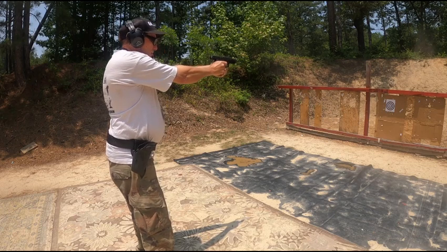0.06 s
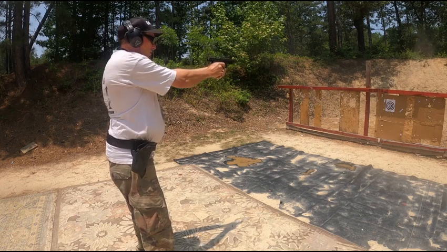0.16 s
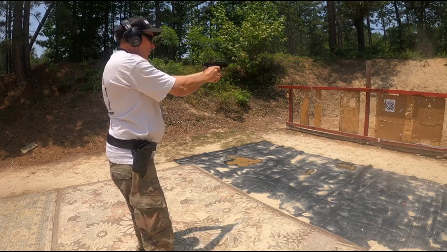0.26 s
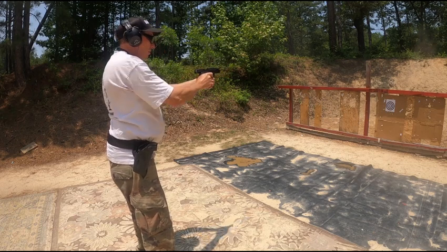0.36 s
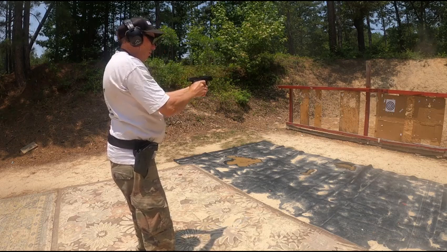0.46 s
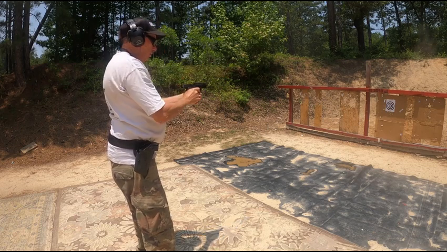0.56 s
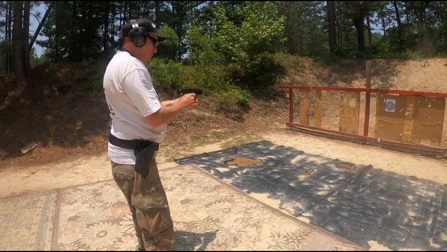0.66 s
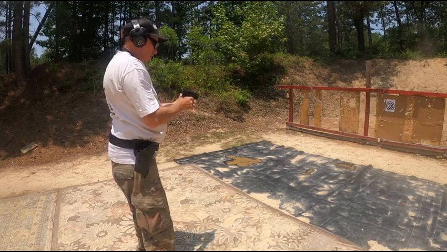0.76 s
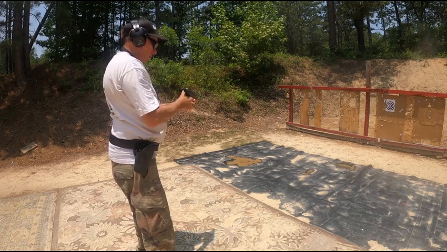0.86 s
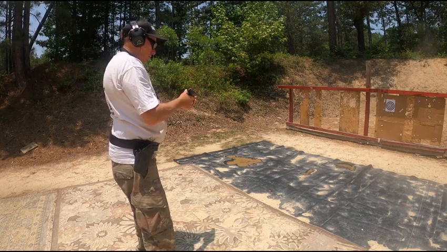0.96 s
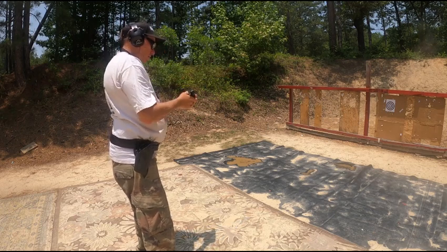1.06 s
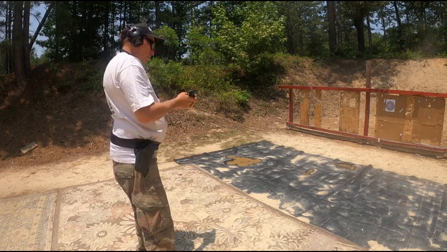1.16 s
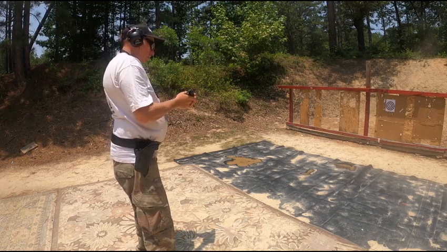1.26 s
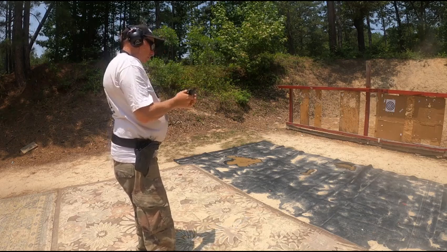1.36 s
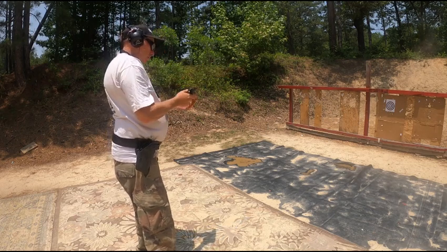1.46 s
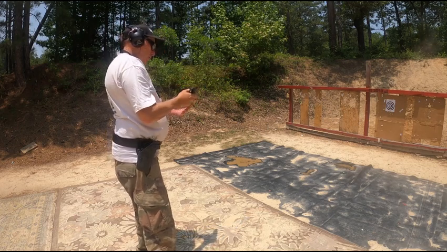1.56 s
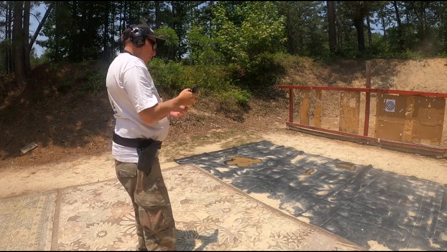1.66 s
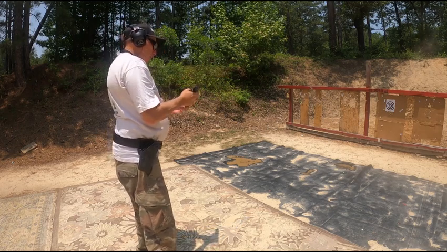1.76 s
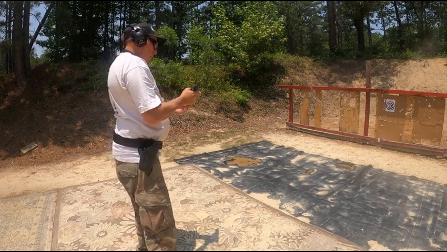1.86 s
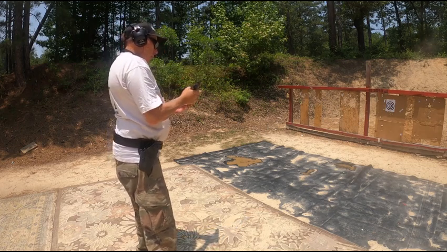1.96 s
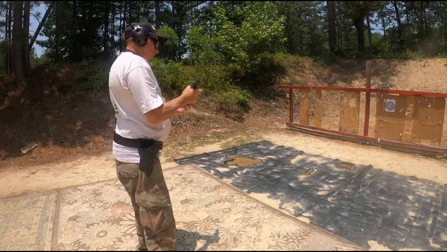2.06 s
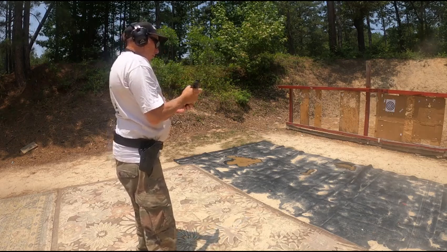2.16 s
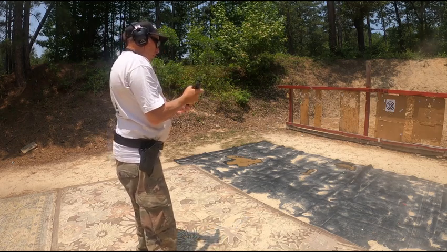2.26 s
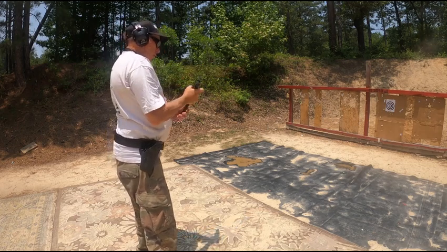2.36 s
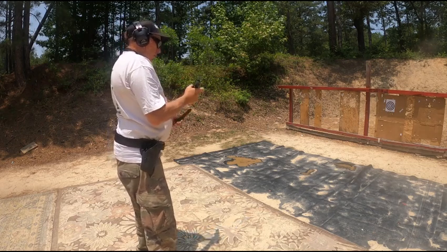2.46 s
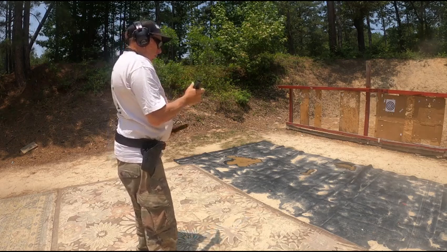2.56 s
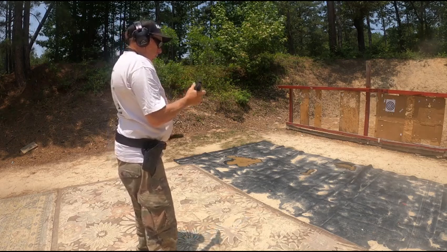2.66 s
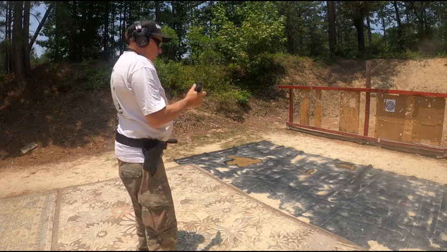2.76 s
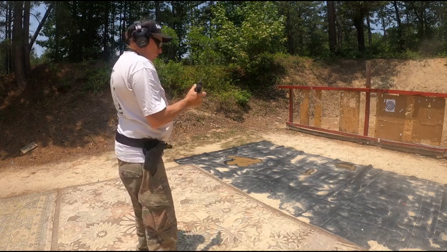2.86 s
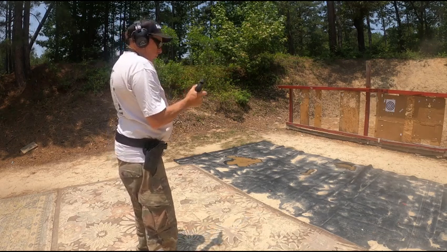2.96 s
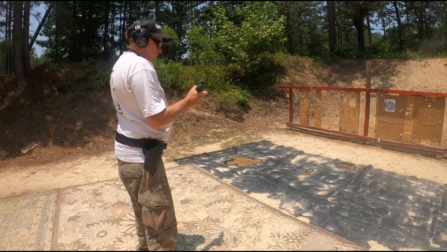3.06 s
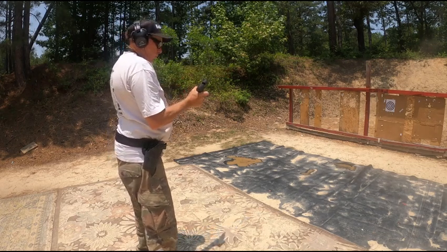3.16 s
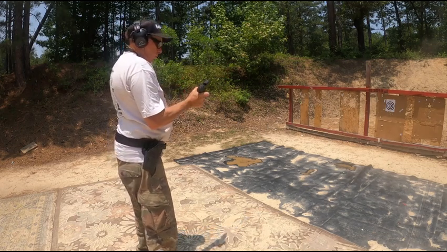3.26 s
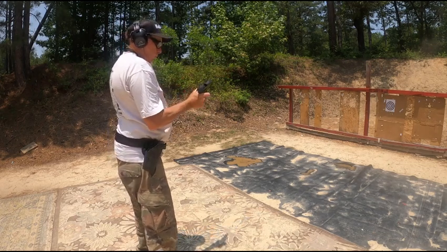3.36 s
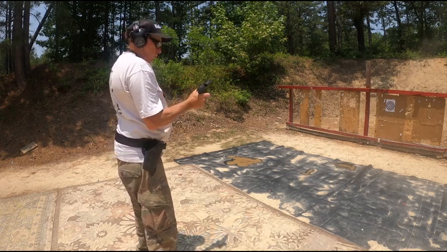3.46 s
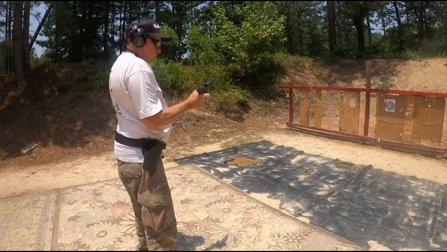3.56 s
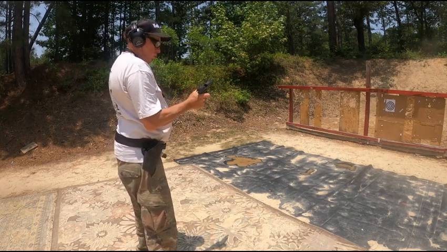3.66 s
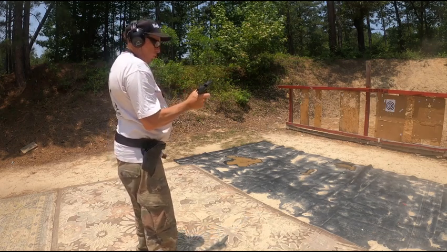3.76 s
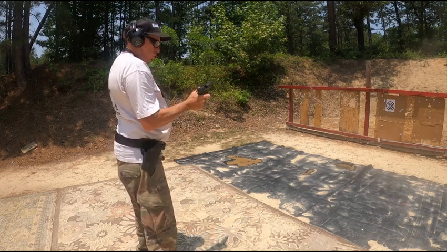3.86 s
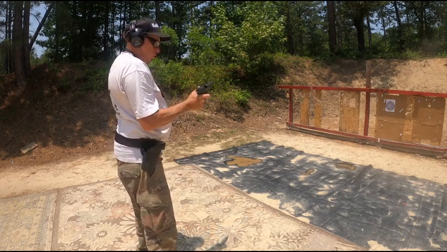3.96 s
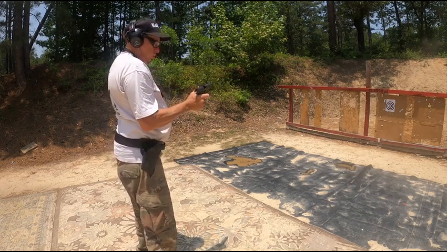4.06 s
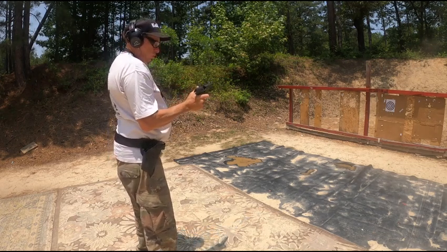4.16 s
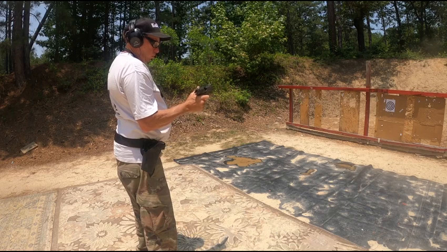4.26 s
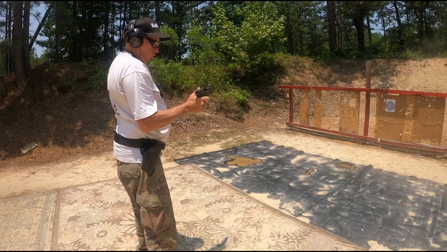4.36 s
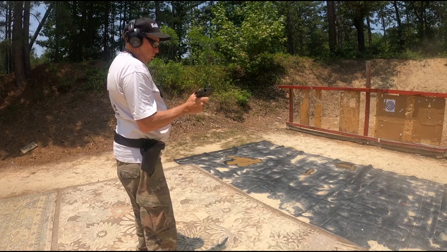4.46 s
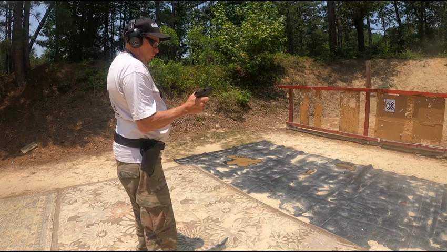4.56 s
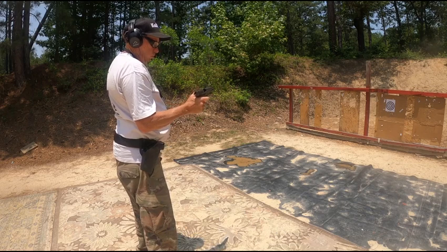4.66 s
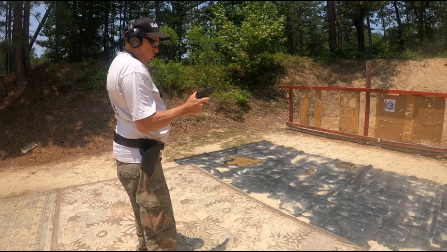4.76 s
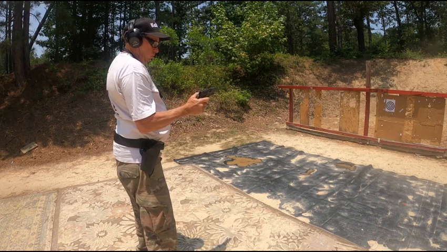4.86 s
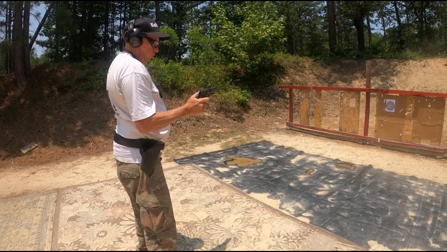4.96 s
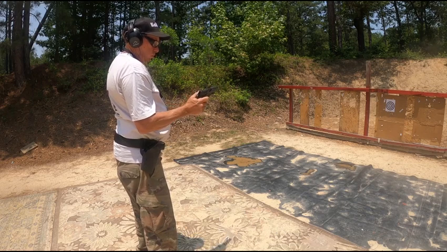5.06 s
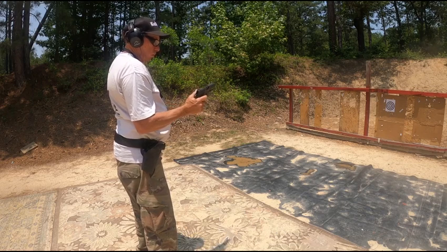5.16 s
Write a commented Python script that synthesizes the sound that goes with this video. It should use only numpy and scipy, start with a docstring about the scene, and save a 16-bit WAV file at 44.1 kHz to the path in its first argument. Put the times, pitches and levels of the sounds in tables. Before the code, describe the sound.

An outdoor pistol blast rolls off into trees, followed by quiet metallic handling clicks and a sharp snap of the slide closing.

```python
"""An outdoor pistol range among woods. A shot has just gone off: its blast slaps back from the berms
and rolls away through the trees, over a faint breeze. A bird whistles far off. The magazine is unlatched
and scrapes out of its well, and the pistol's steel ticks in the hands; dull bumps and a soft, far rush
pass by. A catch rings, then the spring drives the slide forward, it snaps shut on its stop, and the
range answers with a short echo."""
import sys
import numpy as np
from scipy import signal
from scipy.fft import rfft, irfft
from scipy.io import wavfile

SR = 44100
rng = np.random.default_rng(int(sys.argv[2]) if len(sys.argv) > 2 else 0)


def wrap_up_sound(samples):
    """Save the sound to the file named by the first command line argument, as 16-bit audio."""
    columns = np.atleast_2d(samples).T
    # keep every value between -1 and 1, then stretch to whole-number steps
    tamed = np.clip(columns, -1, 1)
    steps = np.round(tamed * 32767).astype(np.int16)
    wavfile.write(sys.argv[1], SR, steps)


N = 229981
TIME, FREQS = np.arange(N) / SR, np.fft.rfftfreq(N, 1 / SR)
FRAMES_DELAY_S = .028  # to the target frames and back


def from_db(db):
    """Decibels to gain."""
    return 10 ** (np.asarray(db) / 20)


def rms_one(x):
    """Scale to rms 1."""
    return x / np.sqrt(np.mean(x ** 2) + 1e-20)


def eq_gain(curve):
    """Gain at each frequency from (f/Hz, level/dB) points on a log-frequency axis."""
    hz, db = np.transpose(curve)
    return from_db(np.interp(np.log(FREQS + 0.0014), np.log(hz), db))


def coloured(x, curve):
    """Shape a steady signal with an EQ curve; rms 1."""
    return rms_one(irfft(rfft(x) * eq_gain(curve) * (FREQS > 20), N))


def noise(curve):
    """Noise shaped by an EQ curve; rms 1."""
    return coloured(rng.standard_normal(N), curve)


def band(x, low_hz, high_hz, order=2):
    """Causal band-pass."""
    sos = signal.butter(order, [low_hz, min(high_hz, .45 * SR)], "band", fs=SR, output="sos")
    return signal.sosfilt(sos, x)


def band_noise(low_hz, high_hz):
    """Band-passed noise; rms 1."""
    return rms_one(band(rng.standard_normal(N), low_hz, high_hz))


def envelope(start_s, attack_s, length_s, sag_db_per_s, fall_db_per_s):
    """Rises to 1, sags until its length is over, then falls away."""
    age = np.maximum(TIME - start_s, 0)
    rise = np.minimum(age / max(attack_s, 1 / SR), 1) ** 2
    held = np.maximum(np.minimum(age, length_s) - attack_s, 0)
    released = np.maximum(age - max(length_s, attack_s), 0)
    return rise * from_db(-sag_db_per_s * held - fall_db_per_s * released)


def burst(start_s, attack_s, fall_db_per_s):
    """Rises to 1 and falls away at once."""
    return envelope(start_s, attack_s, 0, 0, fall_db_per_s)


def resonate(x, modes):
    """Parallel resonances of (f/Hz, width/Hz, level/dB), with alternating signs."""
    out = 0
    for k, (hz, width, db) in enumerate(modes):
        r = np.exp(-np.pi * width / SR)
        poles = [1, -2 * r * np.cos(2 * np.pi * hz / SR), r * r]
        ring = signal.lfilter([1, 0, -1], poles, x + 1e-18)
        out = out + (-1) ** k * from_db(db) * (1 - r * r) / 2 * ring
    return out


def slips(per_s, spread_db):
    """Dense stick-slip clicks of uneven size."""
    sizes = from_db(spread_db * np.minimum(rng.exponential(1, N), 4)) * rng.choice([-1, 1], N)
    return sizes * (rng.random(N) < per_s / SR)


def scatter(x, strength):
    """Up to a second of small reflections under a strength envelope; the response has unit energy."""
    response = rng.standard_normal(SR) * strength[:SR]
    return signal.fftconvolve(x, response / np.linalg.norm(response))[:N]


# Mid-heavy EQ of the blast's tail: f/Hz, level/dB
ROLL_EQ = [(40, -36), (130, -19.5), (260, -9.5), (500, -2), (900, -1), (1300, -2.5), (1900, -11),
           (2600, -7.5), (3500, -11.5), (5500, -17), (8500, -23), (11000, -35), (15000, -52)]

def rolling_blast(absorb_db_per_s=8.0, bass_linger_db_per_s=5.0):
    """Berms and woods scatter the blast; later sound has crossed more air and leaves, so it is duller."""
    berms = from_db(-33.5 - 87 * np.maximum(TIME - 0.14, 0))  # short hold, fast release
    woods = from_db(-39 - 18 * TIME)  # long tail
    spectrum = rfft(noise(ROLL_EQ))
    spectrum /= np.std(irfft(spectrum * (FREQS > 700) * (FREQS < 1400), N))  # rms 1 around 1 kHz
    centres = np.geomspace(200, 16000, 22)
    roll = 0
    for khz, selector in zip(centres / 1000, np.eye(len(centres))):
        loss_db_per_s = absorb_db_per_s * (khz ** 0.97 - 1) - bass_linger_db_per_s * max(1 - khz, 0)
        one_band = irfft(spectrum * np.interp(FREQS, centres, selector), N)
        roll = roll + one_band * from_db(-loss_db_per_s * TIME)
    return roll * np.hypot(berms, woods)


# Low-end body of the blast: f/Hz, level/dB
BOOM_EQ = [(25, -11), (60, 1), (130, -10.5), (230, 14), (400, -6.5), (900, -44)]

def boom():
    """The bass of the blast stays between the berms for a quarter of a second."""
    shape = envelope(0, 0, length_s=0.18, sag_db_per_s=123, fall_db_per_s=353)
    return from_db(-30.5) * shape * noise(BOOM_EQ)


# Slapbacks of the blast: t/s, peak level/dB, pulse pitch f/Hz
SLAPS = [(.0083, -16.5, 680), (0.0127, -22, 456), (0.0607, -18, 264), (0.109, -26, 200), (.222, -31, 480)]

def slaps():
    """Flat surfaces return the blast as single pressure waves: a dip, then a crest."""
    out = np.zeros(N)
    for s, db, hz in SLAPS:
        phase = 2 * np.pi * hz * (TIME - s)
        out += from_db(db) * phase * np.exp((1 - phase ** 2) / 2)
    return out


# Low bed of the breeze: f/Hz, level/dB
RUMBLE_EQ = [(25, -8.5), (60, -2), (110, -6), (140, 0), (180, 2.5), (230, -4.5), (290, -10), (450, -17.5),
             (800, -49)]
# Airy hiss of leaves and insects: f/Hz, level/dB
LEAVES_EQ = [(300, -10), (500, -0.5), (750, -7), (1250, -5.5), (2200, -9), (3100, -14), (5000, -20),
             (7500, -20.5), (8200, -27.5), (9300, -24.5), (10500, -38), (15500, -49)]

def breeze(full_at_s=2.68, rise_db_per_s=5.5):
    """A soft, lumpy rumble and a hiss of leaves fade up after the shot."""
    gusts = from_db(1.1 * noise([(20, 1.5), (30, 3), (60, -59.0)]))
    rumble = from_db(-62) * gusts * noise(RUMBLE_EQ)
    leaves = from_db(-70) * noise(LEAVES_EQ)
    return (rumble + leaves) * from_db(-rise_db_per_s * np.maximum(full_at_s - TIME, 0))


# The bird's phrase: t/s, length/s, first f/Hz, last f/Hz, level/dB before the mix
BIRD_NOTES = [(1.615, .03, 3500, 3360, -78), (1.631, 0.05, 3080, 2940, -65.5),
              (1.648, 0.01, 6200, 4900, -68.5), (1.694, 0.071, 2913, 3170, -67),
              (1.745, 0.055, 2850, 2434, -67), (1.788, 0.065, 2580, 3260, -67),
              (1.815, 0.048, 6460, 5270, -76), (1.838, 0.0644, 3330, 3675, -67.5),
              (1.883, 0.116, 3430, 3340, -72.5), (2.031, 0.041, 4840, 5310, -73),
              (2.073, 0.032, 7120, 4590, -62)]

def bird(near_db=-2.0, woods_db=-3.5):
    """Gliding, slightly warbling whistles; near branches blur them and the far trees add a dull tail."""
    song = np.zeros(N)
    flutter = 1 + .02 * band_noise(60, 250)
    for s, length, first_hz, last_hz, db in BIRD_NOTES:
        progress = np.clip((TIME - s) / length, 0, 1)
        pitch = (first_hz + (last_hz - first_hz) * progress) * flutter
        song += from_db(db) * 2 * np.sin(np.pi * progress) * np.sin(2 * np.pi * np.cumsum(pitch) / SR)
    blurred = (song + scatter(song, burst(0, 0, fall_db_per_s=400))) / 2
    tail = band(scatter(song, burst(0, attack_s=0.013, fall_db_per_s=55)), 1500, 4000)
    return from_db(near_db) * blurred + from_db(woods_db) * tail


# Ring of the magazine's steel tube: f/Hz, width/Hz, level/dB
MAGAZINE_MODES = [(1275, 44, 3.5), (2200, 107, 9), (3398, 21, 5), (3840, 42, 2.5), (4300, 160, -17),
                  (4700, 43, -39), (5620, 18, 0), (6230, 71, -20), (6500, 61, -10), (7300, 130, -1.5),
                  (8700, 14, 1), (9030, 33, -4)]
# EQ of the dry scrape: f/Hz, level/dB
RUB_EQ = [(300, -39), (750, -19), (1250, -4), (1650, -54), (2400, 10), (3400, 4), (4400, 1), (5000, -8),
          (9000, -12), (10500, -16), (15000, -27)]
# Pulls on the magazine: t/s, length/s, level/dB, sag as the grip loosens/(dB/s)
PULLS = [(2.277, 0.12, -46.5, 192), (2.504, 0.16, -43, 65)]

def magazine(ring_share=0.36, spring_db=-8, judder_db=2.5):
    """The tube judders along the well and sings in its own modes; its spring rings on."""
    friction = slips(per_s=5000, spread_db=3.5) * from_db(judder_db * band_noise(20, 160))
    grip = sum(from_db(db) * envelope(s, 0.034, length, sag, fall_db_per_s=480)
               for s, length, db, sag in PULLS)
    rub = coloured(friction, RUB_EQ)
    ring = rms_one(resonate(friction, MAGAZINE_MODES))
    scrape = grip * rms_one((1 - ring_share) * rub + ring_share * ring)
    spring = resonate(scrape, [(3360, 40, 0.8), (3380, 40, -2.9)])
    return scrape + from_db(spring_db) * np.std(scrape) * rms_one(spring)


# Ring of the frame and slide: f/Hz, width/Hz, level/dB
PISTOL_MODES = [(3060, 330, -4), (4200, 43, -13), (4300, 140, -9), (4680, 34, -32), (5140, 62, -2),
                (6200, 36, -43), (6520, 24, 2.5), (7540, 46, -12), (7320, 86, 4.5), (7530, 22, -10),
                (7500, 76, -34), (8850, 100, -32), (9220, 210, 2), (11100, 150, -8)]

def steel_hits(hits, chatter, pistol_ring_db, magazine_ring_db, band_ratio):
    """Each hit is a click and a dying chatter of steel on steel that sets the pistol ringing, with a share of
    the magazine tube's modes added to thicken the ring."""
    out, t = np.zeros(N), TIME[:SR // 10]
    for s, db, hz, chatter_ms in hits:
        force = rng.standard_normal(len(t)) * np.exp(-1000 * t / chatter_ms)
        force *= chatter * chatter_ms / np.linalg.norm(force)  # shorter contacts chatter less
        force[0] += 1  # the click
        force = band(force, hz / band_ratio, hz * band_ratio)
        pistol_ring = from_db(pistol_ring_db) * resonate(force, PISTOL_MODES)
        magazine_ring = from_db(magazine_ring_db) * resonate(force, MAGAZINE_MODES)
        hit = band(force + pistol_ring + magazine_ring, 370, 10000)
        hit *= from_db(db) * np.sqrt(.002 * SR) / np.linalg.norm(hit)  # rms as if packed into 2 ms
        start = int(s * SR)
        out[start:start + len(t)] += hit[:N - start]
    return out


# Handling ticks: t/s, level/dB, brightness f/Hz, chatter/ms
TICKS = [(2.295, -40, 1300, 3.6), (2.2995, -41.5, 3600, 3), (2.3103, -37, 6200, 6),
         (2.3436, -35, 1640, 3.8), (2.376, -41.5, 1920, 4.3), (2.449, -53.5, 1680, 6.4),
         (2.513, -46.5, 2960, 4.9), (2.602, -37, 2320, 9.9), (2.641, -43, 2970, 3.6),
         (2.6615, -39, 1660, 7.6), (3.354, -58.5, 5900, 2.8), (3.9138, -52, 6800, 11),
         (4.054, -52.5, 3070, 12), (4.0685, -37.5, 4470, 2.7), (4.074, -48, 2380, 7.6)]

def ticks():
    """Latch, magazine and small parts tick as the pistol is handled."""
    return steel_hits(TICKS, chatter=0.81, pistol_ring_db=6.5, magazine_ring_db=2, band_ratio=2.0)


def bay_echo(x, frames_db=-21.5, wash_db=-20):
    """One distinct reflection from the target frames, then a wash from berms and trees."""
    frames = scatter(x, burst(FRAMES_DELAY_S, 0, fall_db_per_s=7000))
    wash = scatter(x, envelope(0, attack_s=0.046, length_s=.16, sag_db_per_s=66, fall_db_per_s=350))
    return band(from_db(frames_db) * frames + from_db(wash_db) * wash, 1040, 18000, order=1)


# Soft low bumps: t/s, level/dB
BUMPS = [(2.689, -55), (4.398, -53), (4.70, -54)]

def bumps():
    """Dull thuds in the deep bass, as of shifting feet."""
    strength = sum(from_db(db) * burst(s, attack_s=0.018, fall_db_per_s=260) for s, db in BUMPS)
    return strength * band_noise(65, 131)


# Midrange EQ of the far rush: f/Hz, level/dB
RUSH_EQ = [(500, -21), (850, -5), (1200, 2), (1900, -8), (2700, -11), (4500, -27.5), (9000, -39)]

def far_rush():
    """A soft rush, perhaps a far shot rolling through the woods, swells and fades."""
    return from_db(-59) * burst(2.745, attack_s=.19, fall_db_per_s=16.5) * noise(RUSH_EQ)


def catch(start_s=4.067, level_db=-41.5, echo_db=-14):
    """The catch rings briefly on one note, and the target frames throw the ring back."""
    direct, echo = (burst(start_s + delay, attack_s=0.0012, fall_db_per_s=1702)
                    for delay in (0, FRAMES_DELAY_S))
    return from_db(level_db) * band_noise(4300, 4860) * (direct + from_db(echo_db) * echo)


def slide_blows(release_s, shut_s):
    """The slide knocks along its rails, ever brighter, hits the stop and rebounds, ever weaker."""
    # t/s, level/dB, brightness f/Hz, chatter/ms
    knocks = [(release_s + k * .005, -21, 2460 + k * 332, 2.2) for k in range(4)]
    stop = [(shut_s, -7, 3420, 0.97)]
    rebounds = [(shut_s + (k + 1) * .0037, -14.5 - k * 6.5, 4100, 3) for k in range(3)]
    blows = knocks + stop + rebounds
    return steel_hits(blows, chatter=0.93, pistol_ring_db=-0.5, magazine_ring_db=-5, band_ratio=2.1)


def slide(release_s=5.0177, shut_s=5.040, thump_hz=90, thump_decay_s=0.0057):
    """The rails squeak louder as the sprung slide gains speed; its stop jolts the frame and the hands."""
    friction = slips(per_s=15000, spread_db=2.0)
    rails = rms_one(resonate(friction, [(7700, 390, -3), (3300, 680, -14)]))
    to_go, age = np.maximum(shut_s - TIME, 0), np.maximum(TIME - shut_s, 0)
    squeak = band(rails, 1260, 8000) * from_db(-17.5 - 863 * to_go - 2000 * age)
    thump = from_db(-35) * np.sin(2 * np.pi * thump_hz * age) * np.exp(-age / thump_decay_s)
    jolt = from_db(-38) * band_noise(26, 2200) * burst(5.005, attack_s=0.036, fall_db_per_s=700)
    return squeak + thump + jolt + slide_blows(release_s, shut_s)


# Stereo width, as the EQ of the side signal: f/Hz, level/dB
SIDE_EQ = [(25, -13), (125, -39.5), (500, -64), (2000, -58), (4000, -40.5), (8000, -20.5), (13000, -6)]

def stereo_microphone(mid):
    """Two close ports hear almost alike; scattered treble reaches them differently."""
    scattered = scatter(mid, burst(0, 0, fall_db_per_s=2393))
    side = irfft(rfft(scattered) * eq_gain(SIDE_EQ), N)
    return np.array([mid + side, mid - side])


def scene():
    """The shot's echoes, the handled pistol with the bay's answer, and the woods."""
    shot = rolling_blast() + boom() + slaps()
    handling = ticks() + magazine() + catch() + slide()
    mix = shot + handling + bay_echo(handling) + bird() + breeze() + bumps() + far_rush()
    return stereo_microphone(mix)


def record(dry, ceiling=.88, cutoff_hz=15750):
    """A soft clip rounds the peaks under full scale, then a steep low-pass cuts the top."""
    rounded = dry / (1 + (dry / ceiling) ** 6) ** (1 / 6)
    return signal.sosfilt(signal.ellip(10, .1, 80, cutoff_hz, fs=SR, output="sos"), rounded)


dry = scene()
out = record(dry)
wrap_up_sound(out)
```